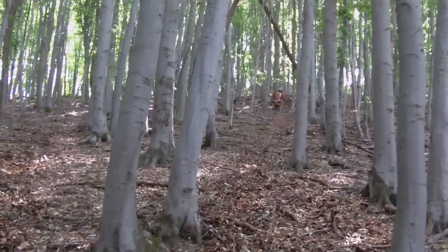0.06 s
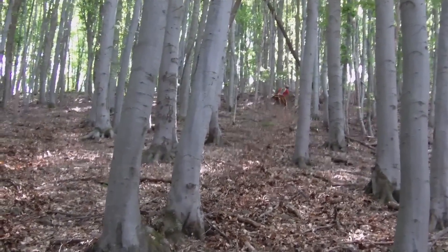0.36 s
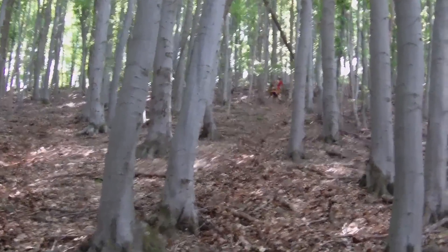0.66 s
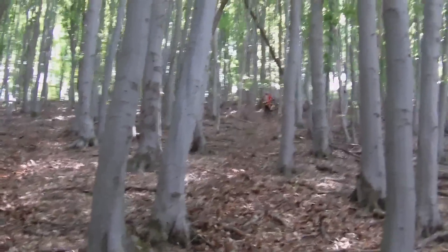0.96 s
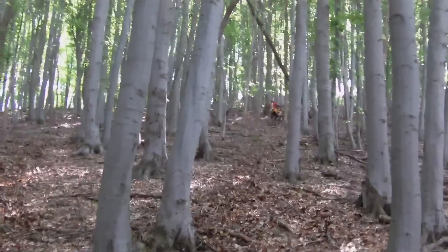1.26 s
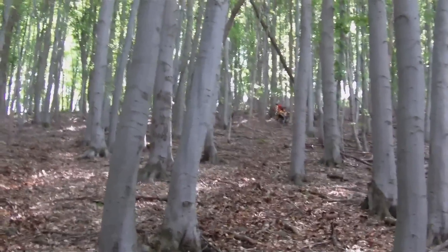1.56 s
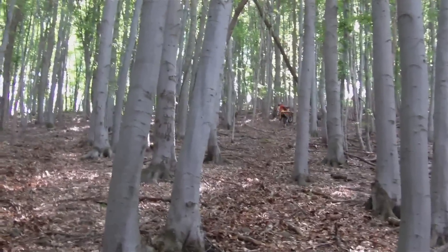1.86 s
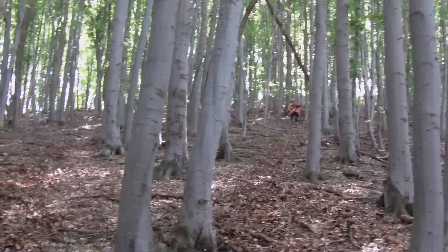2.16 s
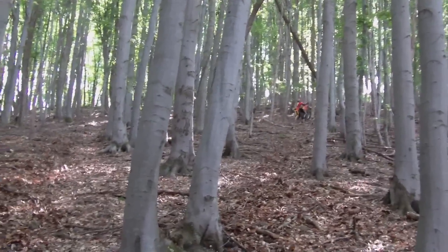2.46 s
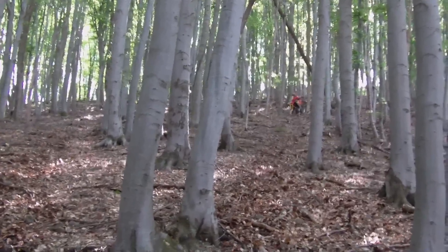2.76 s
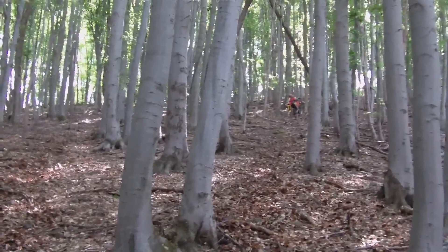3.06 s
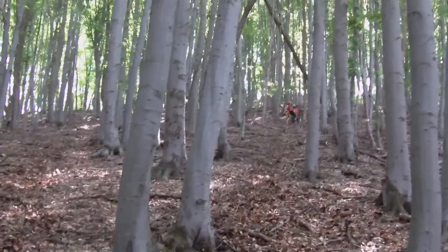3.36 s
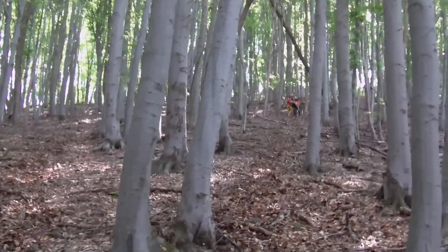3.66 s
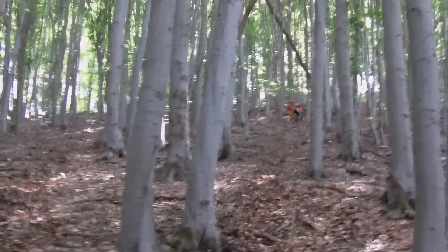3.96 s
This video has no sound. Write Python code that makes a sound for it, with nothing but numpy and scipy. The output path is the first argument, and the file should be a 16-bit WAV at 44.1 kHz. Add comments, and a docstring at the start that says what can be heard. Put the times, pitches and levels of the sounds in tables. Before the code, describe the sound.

A dirt bike's exhaust pops sharply in three rapid runs within the first second, echoing among the trees, with three low knocks under the first run. A crackling rush of dry leaves and soil swells with the pops and fades by about 2 seconds. Twigs snap throughout, leaves swish close by, and soft ground thuds follow from 1.6 seconds. Near 3.8 seconds the rush starts again.

```python
"""A wooded slope, on one microphone. Three short runs of sharp pops, probably a dirt bike's exhaust,
scatter among the trunks; each pop is a tick, a brief ring and a puff of gas. A rush of dry leaves and
soil, made of countless crackles, swells with them, dies away and starts again at the end.
Three low knocks sound under the first run, as when loud pops overload a recorder; soft ground thuds
come later. Twigs snap, leaves swish close by and a faint low drone wavers far off."""
import sys
import numpy as np
from scipy import signal
from scipy.fft import rfft, irfft
from scipy.io import wavfile
from scipy.ndimage import uniform_filter1d

SR = 44100
rng = np.random.default_rng(int(sys.argv[2]) if len(sys.argv) > 2 else 0)


def dump(signal):
    """Clip the signal to [-1, 1] and save it as 16-bit WAV at the path in sys.argv[1]."""
    limited = np.clip(np.atleast_2d(signal).T, -1, 1)
    pcm = np.round(limited * 32767).astype(np.int16)
    wavfile.write(sys.argv[1], SR, pcm)


N = 176400


def undb(db):
    """Decibels to gain."""
    return 10 ** (np.asarray(db) / 20)


def unit(x):
    """Scale to rms 1."""
    return x / np.sqrt(np.mean(x ** 2))


def curve(table, column):
    """One column of a timed table, joined by straight lines."""
    rows = np.array(table)
    return np.interp(np.arange(N) / SR, rows[:, 0], rows[:, column])


def tint(x, colour):
    """Filter by a spectrum of (f/Hz, level/dB) points on a log-frequency axis; rms 1."""
    rows, hz = np.array(colour), np.fft.rfftfreq(N, 1 / SR)
    gain = undb(np.interp(np.log(hz + 1), np.log(rows[:, 0]), rows[:, 1]))
    return unit(irfft(rfft(x) * gain, N))


def noise(colour):
    """Noise of rms 1 with a spectrum of (f/Hz, level/dB) points."""
    return tint(rng.standard_normal(N), colour)


def wander(per_s):
    """Smoothed random steps, rms 1."""
    hold = int(SR / per_s)
    steps = np.repeat(rng.standard_normal(N // hold + 1), hold)
    return unit(uniform_filter1d(uniform_filter1d(steps, hold), hold)[:N])


def add(out, at, sound):
    """Mix a sound in at a time in seconds."""
    i = int(np.clip(at * SR, 0, N - 1))
    out[i:i + len(sound)] += sound[:N - i]


def strike(t, attack_s, decay_s):
    """Quick rise, exponential fall, peak 1."""
    shape = (1 - np.exp(-(t / attack_s) ** 2)) * np.exp(-t / decay_s)
    return shape / shape.max()


def reflections(x, t60_s, db):
    """Ground and trunks scatter the sound back to the microphone as a dense decaying tail."""
    tail = noise([(100, 26.5), (600, 4), (2000, 1.5), (6000, 0.5), (15000, -5)])
    tail *= strike(np.arange(N) / SR, 0.0013, t60_s / np.log(1000))
    return undb(db) * signal.fftconvolve(x, tail / np.sqrt(np.sum(tail ** 2)))[:N]


def far_drone():
    """Far off, a faint wavering low tone and its octave throb unevenly."""
    # course of the drone: t/s, f/Hz, relative level/dB
    course = [(0, 76.3, -49), (.55, 76, -63.5), (.72, 111.9, -58.5), (.88, 67.9, -57), (1.08, 86.2, -62),
              (1.3, 73, -62), (1.45, 63.6, -64), (1.6, 62.3, -88), (4, 62, -120)]
    hz = curve(course, 1)
    phase = 2 * np.pi * np.cumsum(hz * (1 + .06 * wander(30))) / SR
    throb_hz = 27.95 * (1 + 0.094 * wander(18))
    throb = 1 + .6 * np.sin(2 * np.pi * np.cumsum(throb_hz) / SR)
    fundamental = undb(0.2017 * hz - 20) * np.sin(phase)  # weakens as the pitch falls
    octave = undb(1) * np.sin(2 * phase)
    return undb(curve(course, 2) + 2 * wander(51)) * throb * (fundamental + octave)


def leaf_swishes():
    """Leaves brush near the microphone in short bright swishes."""
    # swishes: t/s, length/s, level/dB
    swishes = [(0.255, 0.55, -44), (0.59, 0.026, -35), (3.825, 0.31, -45.5), (1.28, .15, -43.5),
               (2.131, 0.021, -42), (2.148, 0.016, -37), (2.576, 0.014, -45.5)]
    # spectrum of brushing leaves: f/Hz, level/dB
    colour = [(120, -40), (300, -14.5), (1500, 2), (4000, 1.5), (8000, 2.5), (12000, -12), (15500, -6.5)]
    envelope = np.zeros(N)
    for at, length, db in swishes:
        add(envelope, at, undb(db) * np.sqrt(np.abs(np.hanning(int(length * SR)))))
    return envelope * noise(colour)


def knocks_and_thuds():
    """Damped tones with dull noise: low knocks as of pops overloading the recorder, then ground thuds."""
    # three knocks, then the soft thuds: t/s, relative level/dB, f/Hz, decay/s
    thumps = [(.0625, -20, 130, 0.0015), (0.1294, -8, 185, 0.00088), (.2035, -5.5, 754, 0.0021),
              (1.62, -55, 115, 0.017), (1.755, -61, 121, 0.0095), (1.847, -48, 444, 0.0062),
              (2.165, -40.5, 493, 0.015), (2.39, -38.5, 525, 0.0021), (2.714, -37.5, 540, 0.0059),
              (2.726, -40.5, 550, .006), (2.817, -47, 358, 0.0024), (2.987, -55, 256, 0.0062),
              (3.162, -35, 520, 0.0062), (3.176, -42, 540, 0.0036), (3.35, -42, 567, 0.0068),
              (3.75, -28, 512, 0.0013)]
    out, t = np.zeros(N), np.arange(SR // 10) / SR
    for at, db, hz, decay in thumps:
        band = signal.butter(2, [0.45 * hz, 2.47 * hz], "band", fs=SR, output="sos")
        tone = 0.53 * np.sin(2 * np.pi * hz * t)
        dull_noise = undb(-3.5) * unit(signal.sosfilt(band, rng.standard_normal(len(t))))
        envelope = undb(db) * strike(t, 0.00046, decay)
        add(out, at, signal.sosfilt(band, envelope * (tone + dull_noise)))
    return out


def twig_snaps():
    """A breaking twig rings briefly in two modes, with a splintery crack."""
    # breaks: t/s, relative level/dB, f/Hz, decay/s
    breaks = [(.166, -8, 3680, 0.001), (.4105, -19, 1890, 0.0012), (.564, -26, 1860, 0.0026),
              (.959, -17, 1600, 0.0026), (1.014, -20, 1850, .002), (1.038, -27, 1840, 0.0018),
              (1.084, -19, 1520, 0.0044), (1.108, -21, 1610, 0.0027), (1.336, -24, 2610, 0.0016),
              (1.357, -20.5, 2940, 0.0042), (1.447, -23.5, 1813, 0.0086), (1.459, -23.5, 2000, 0.0015),
              (1.495, -25, 6200, 0.0013), (1.518, -26, 2560, .002), (1.607, -11.5, 3000, 0.00036),
              (1.620, -22, 2900, .002), (1.759, -24, 2040, 0.0013), (2.4155, -28.5, 1882, 0.0024),
              (2.4598, -17.5, 3430, 0.0018), (2.5245, -27, 3800, 0.0023), (2.581, -19.5, 3500, 0.0005),
              (2.9321, -26.5, 1760, 0.00097), (3.614, -43, 2480, 0.00097), (3.717, -40.5, 3500, 0.0011),
              (3.774, -37, 3420, 0.00088), (3.839, -27, 2220, 0.00049), (3.853, -33, 2670, 0.0014),
              (3.898, -27, 2310, 0.0034), (3.968, -29.5, 2300, 0.0026)]
    rings, crack_envelope, t = np.zeros(N), np.zeros(N), np.arange(SR // 20) / SR
    crack = noise([(300, -34), (1500, 10.5), (3800, 9.5), (5500, -2.5), (8000, -11), (15000, -31.5)])
    for at, db, hz, decay in breaks:
        envelope = undb(db) * strike(t, 0.00016, decay)
        phase = 2 * np.pi * hz * t
        add(rings, at, envelope * (np.sin(phase) + undb(-16.5) * np.sin(0.497 * phase)))
        add(crack_envelope, at, envelope)
    return undb(-2.5) * (rings + undb(-3.5) * crack_envelope * crack)


def leaf_rush():
    """Countless leaf crackles merge into a hiss whose body, middle and treble swell, fade and flicker."""
    # two surges, then settling, in relative levels: t/s, middle/dB, body/dB, treble/dB
    stretches = [
        [(0.0, -21, -23.5, -33.5), (0.21, -17.5, -26, -35.5), (0.378, -25, -27, -34.5),
         (0.54, -30.5, -31.5, -46.5)],
        [(0.6, -24.5, -28, -43), (0.776, -22.5, -28, -40), (0.894, -34.5, -33.5, -41.5),
         (1.038, -30.5, -30, -46), (1.472, -36.5, -45, -45.5), (1.65, -37.5, -53, -49),
         (1.85, -38, -52.5, -49.5)],
        [(1.92, -45, -58.5, -52.5), (2.17, -45.5, -62, -51.5), (2.34, -47.5, -63.5, -55.5),
         (2.85, -46.5, -63, -56.5), (3.17, -53.5, -56.5, -59.5), (3.52, -58.5, -65.5, -63.5),
         (3.77, -58.5, -64, -63), (3.86, -50, -57, -55), (4.0, -41.5, -50.5, -60)],
    ]
    # spectrum of dry leaves and soil: f/Hz, level/dB
    colour = [(30, -36), (100, -30), (230, -20), (380, 0.5), (600, 3.5), (850, 0.5), (1400, 1.5),
              (2000, 1.5), (3000, 3.5), (4200, 2), (6000, 0.5), (8500, -2), (12000, -14), (15500, -25)]
    crackles_per_s, flicker_db = 1500, 0.5
    crackles = (rng.random(N) < crackles_per_s / SR) * rng.choice([-1, 1], N)
    crackles = crackles * undb(3 * np.minimum(rng.exponential(size=N), 5))
    hiss = tint(rng.standard_normal(N) + undb(-6) * unit(crackles), colour)
    course = np.concatenate(stretches)
    anchors_hz = [643, 2890, 7660]  # body, middle, treble
    levels_db = np.array([curve(course, 2) + 6.5, curve(course, 1), curve(course, 3)])
    centres_hz, hz = np.geomspace(150, 14000, 14), np.fft.rfftfreq(N, 1 / SR)
    common_flicker_db = 0.84 * wander(35)
    out, spectrum = np.zeros(N), rfft(hiss)
    for centre, pick in zip(centres_hz, np.eye(len(centres_hz))):
        band = irfft(spectrum * np.interp(np.log(hz + 1), np.log(centres_hz), pick), N)
        weights = np.array([np.interp(np.log(centre), np.log(anchors_hz), row) for row in np.eye(3)])
        out += band * undb(weights @ levels_db + common_flicker_db + flicker_db * wander(25.08))
    return undb(3.5) * out


def exhaust_pops():
    """Each pop is a tick, a sagging ring and a puff of gas; a run's gaps stretch or shrink evenly."""
    # runs: start/s, end/s, rate/Hz, slowing/share, relative level/dB, fade/(dB/s), ring f/Hz, gas/dB
    runs = [(0.019, 0.3913, 40, 0.16, 1, -21.5, 2024, -12), (0.5863, .7095, 50, -0.15, -7.5, -12, 1660, -6),
            (0.8399, 0.9287, 33, -0.0382, -3, -44.5, 2040, -10.5)]
    # spectrum of the puff of gas: f/Hz, level/dB
    gas_colour = [(100, -46), (300, -14.5), (650, 9), (1700, 3), (3500, -2.5), (7000, -22), (15000, -37)]
    # spectrum of a pop's bright edge: f/Hz, level/dB
    tick_colour = [(1000, -24), (2500, 5.5), (4500, 1), (8000, -4.5), (15000, -35.5)]
    attack_s, ring_s, gas_s, tick_s = 0.00054, 0.0014, 0.0045, 0.00035
    rings, puffs, ticks = np.zeros((3, N))
    t = np.arange(SR // 20) / SR
    sag = 1 - 0.23 * (1 - np.exp(-t / ring_s))
    for start, end, rate, slowing, db, fade, ring_hz, gas_db in runs:
        for progress in np.linspace(0, 1, round((end - start) * rate) + 1):
            at = start + (end - start) * progress * (1 - slowing * (1 - progress))
            detune, size = rng.standard_normal(2)
            swell_db = 2.5 * np.sin(np.pi * progress)  # lifts the middle of the run
            gain = undb(db + fade * (at - start) + swell_db + .5 * size)
            hz = ring_hz * np.exp(0.11 * detune) * sag
            ring = np.sin(2 * np.pi * np.cumsum(hz) / SR)
            add(rings, at, gain * strike(t, attack_s, ring_s) * ring)
            add(puffs, at, gain * undb(gas_db) * strike(t, attack_s, gas_s))
            add(ticks, at, gain * strike(t, attack_s, tick_s))
    return undb(-5) * rings + puffs * noise(gas_colour) + undb(-17) * ticks * noise(tick_colour)


def scene():
    """The slope in mono: pops and snaps echo in the wood, the rest stays dry."""
    low_cut = signal.butter(4, 337, "high", fs=SR, output="sos")
    sharp = signal.sosfilt(low_cut, exhaust_pops() + twig_snaps())
    near_echo = reflections(sharp, t60_s=0.24, db=-6.5)
    wood_echo = reflections(sharp, t60_s=1.0, db=-14)
    mix = sharp + near_echo + wood_echo + leaf_rush() + knocks_and_thuds() + leaf_swishes() + far_drone()
    return mix[None]


def record(dry):
    """In the recorder, two narrow bands drop out, the highest peaks clip and the top is cut."""
    # narrow gaps in the recorder's response: f/Hz, width/Hz
    gaps = [(1000, 376), (7850, 440)]
    leak_db, top_hz = -21.5, 15500
    for hz, width in gaps:
        notch = signal.butter(2, [hz - width / 2, hz + width / 2], "bandstop", fs=SR, output="sos")
        dry = signal.sosfilt(notch, dry) + undb(leak_db) * dry
    high_cut = signal.ellip(10, .2, 80, top_hz, fs=SR, output="sos")
    return signal.sosfilt(high_cut, np.clip(dry, -.9, .9))


dry = scene()
out = record(dry)
dump(out)
```